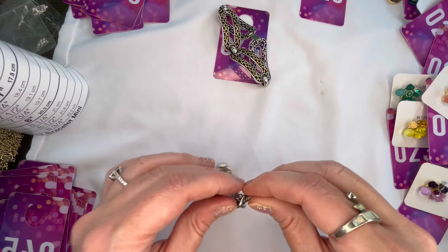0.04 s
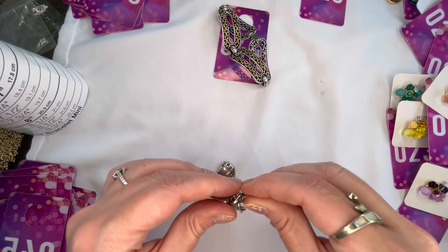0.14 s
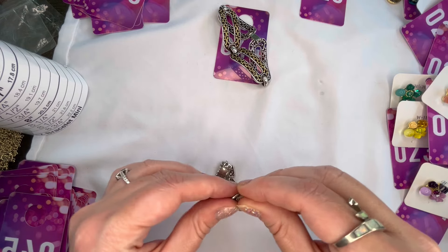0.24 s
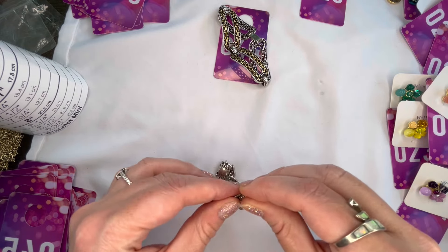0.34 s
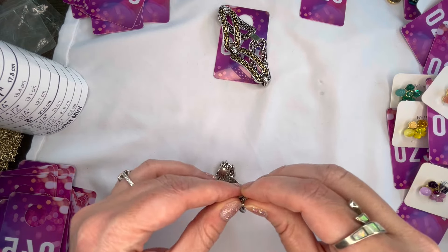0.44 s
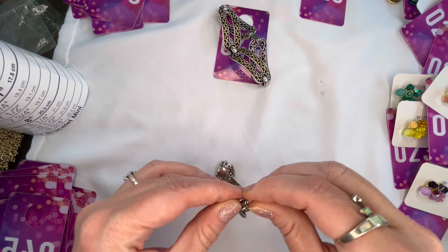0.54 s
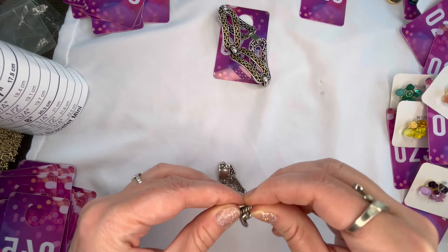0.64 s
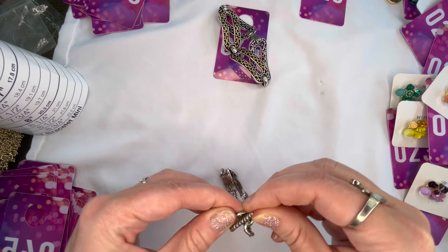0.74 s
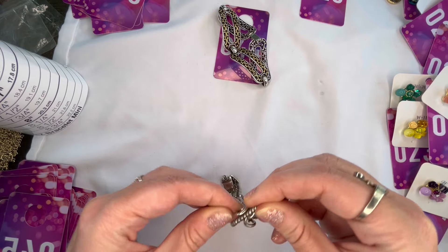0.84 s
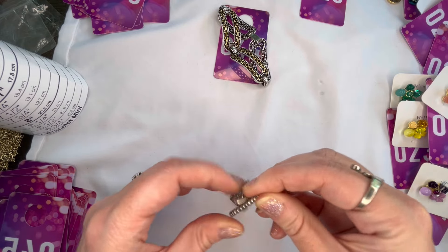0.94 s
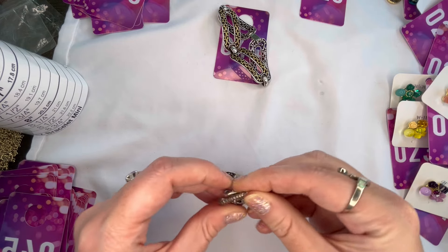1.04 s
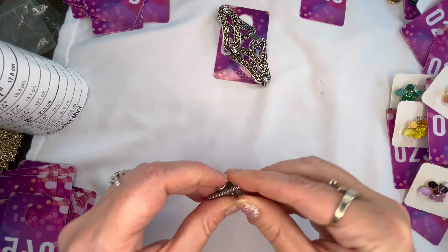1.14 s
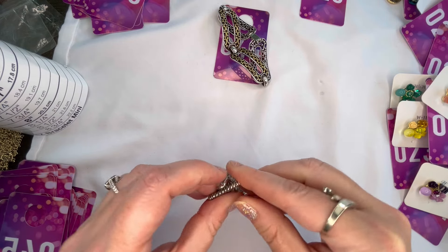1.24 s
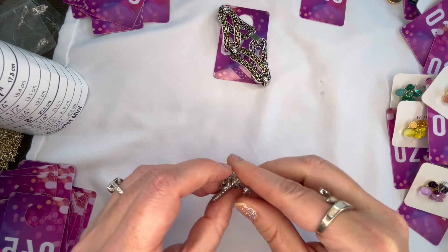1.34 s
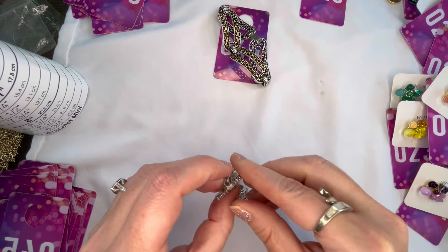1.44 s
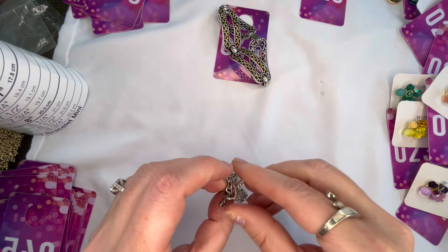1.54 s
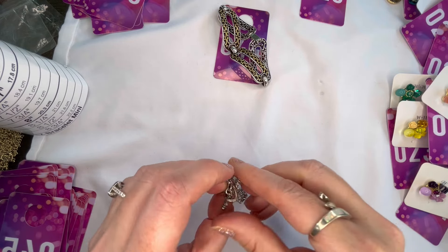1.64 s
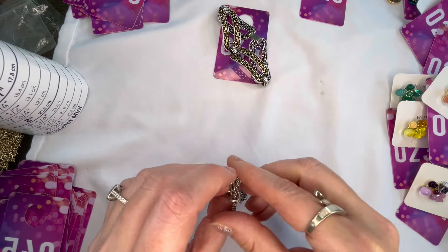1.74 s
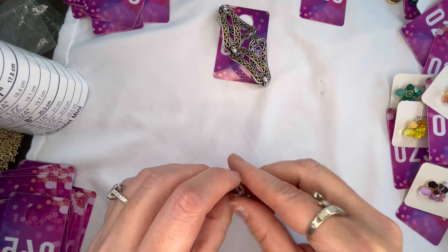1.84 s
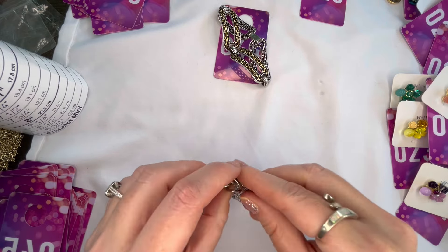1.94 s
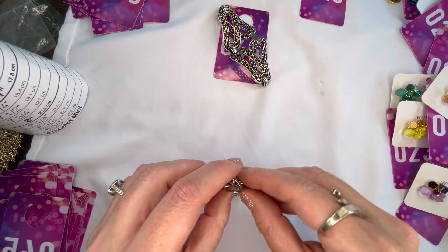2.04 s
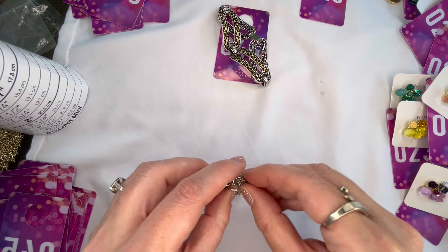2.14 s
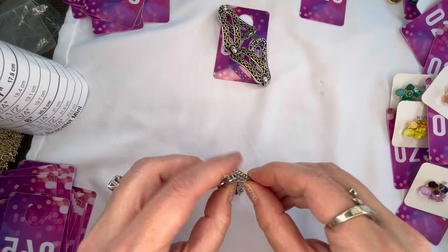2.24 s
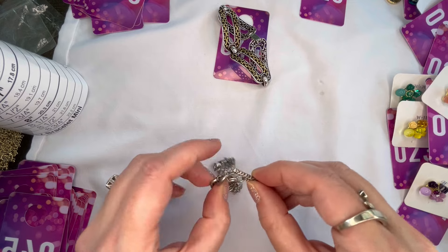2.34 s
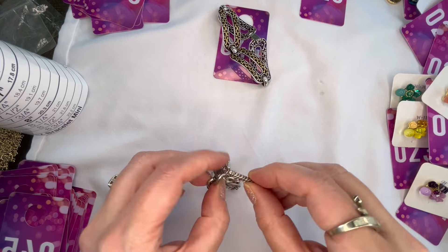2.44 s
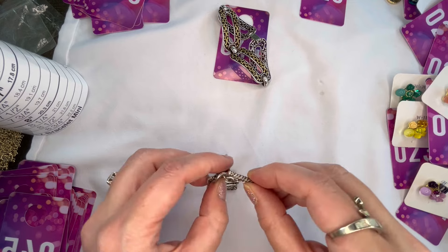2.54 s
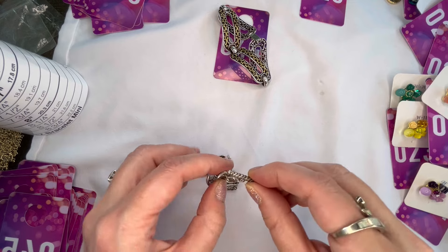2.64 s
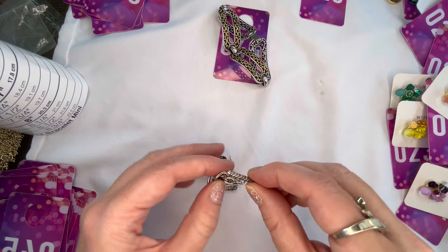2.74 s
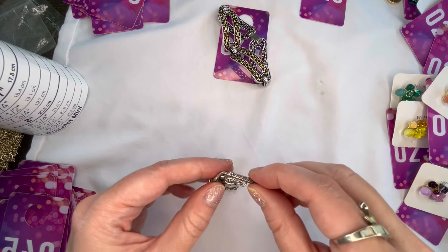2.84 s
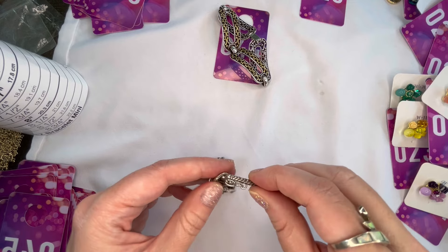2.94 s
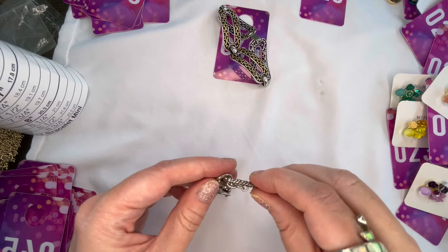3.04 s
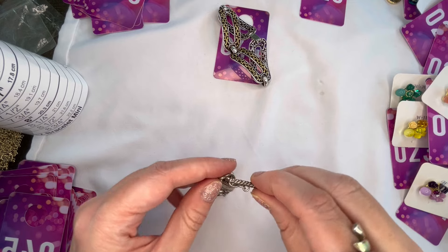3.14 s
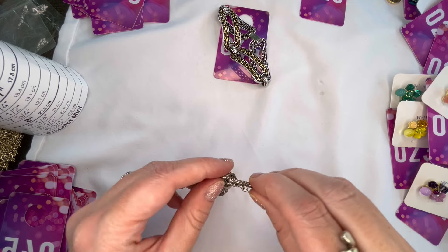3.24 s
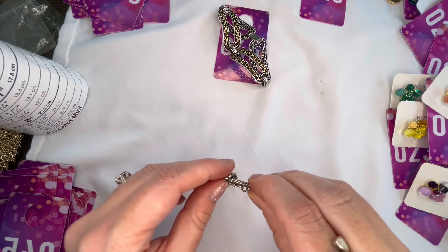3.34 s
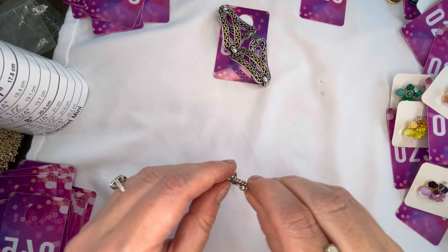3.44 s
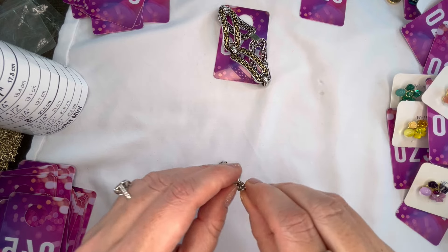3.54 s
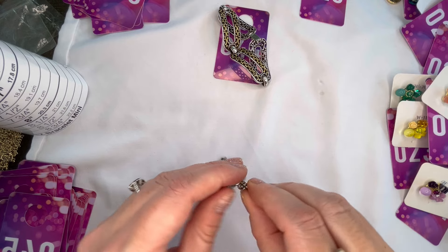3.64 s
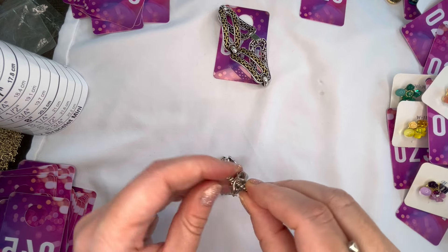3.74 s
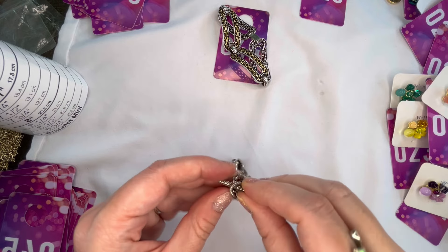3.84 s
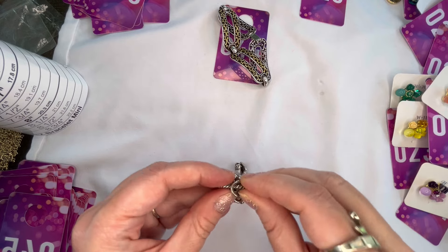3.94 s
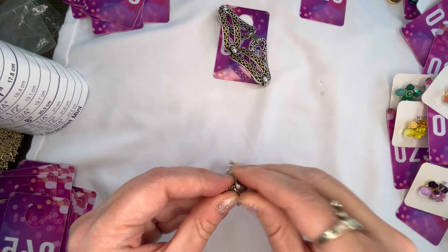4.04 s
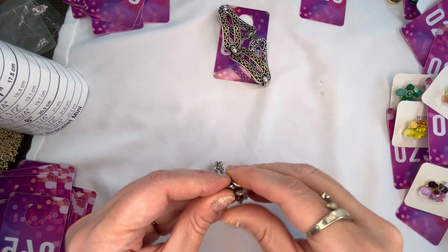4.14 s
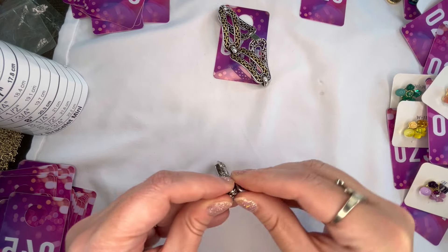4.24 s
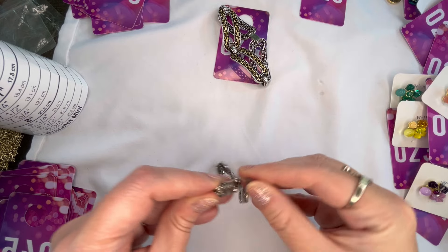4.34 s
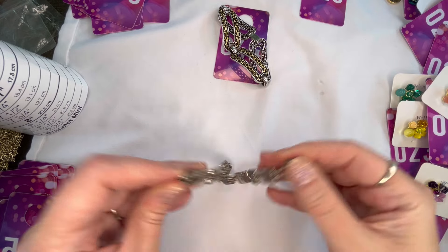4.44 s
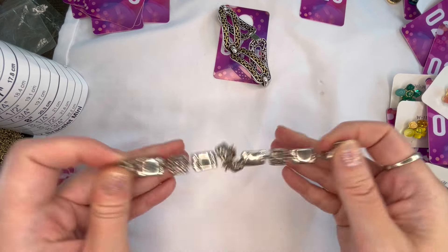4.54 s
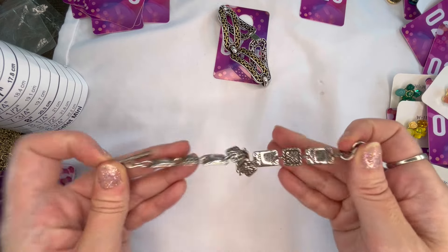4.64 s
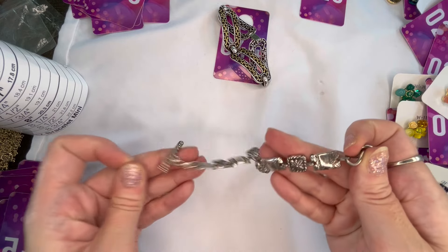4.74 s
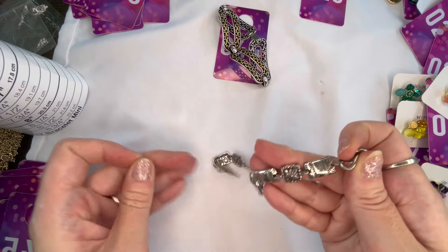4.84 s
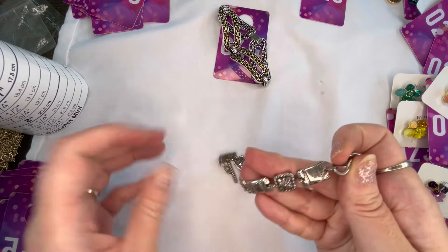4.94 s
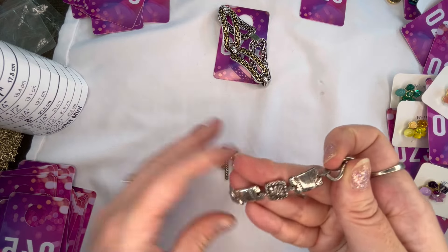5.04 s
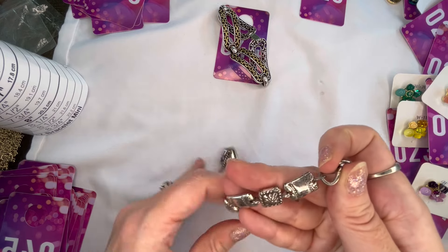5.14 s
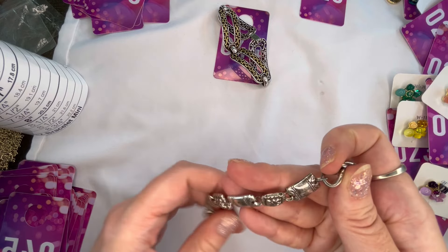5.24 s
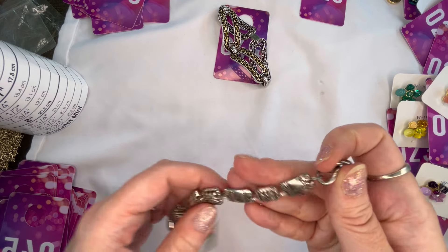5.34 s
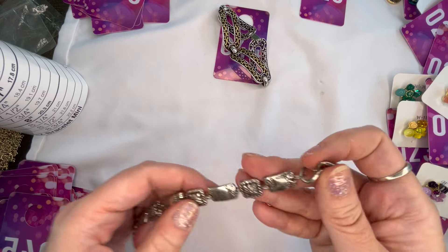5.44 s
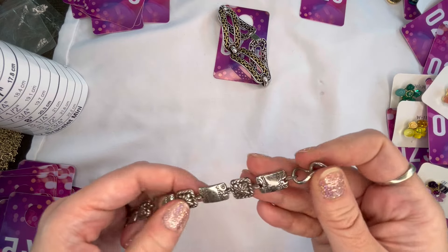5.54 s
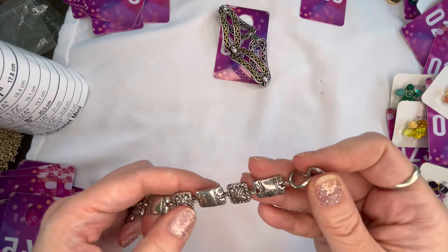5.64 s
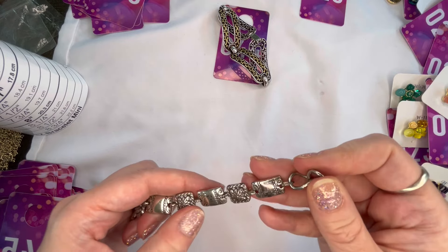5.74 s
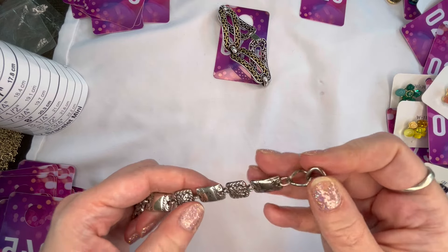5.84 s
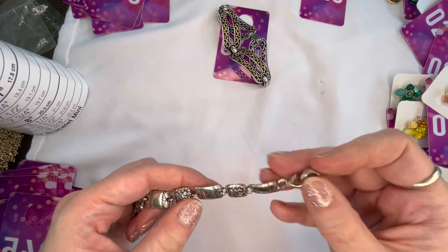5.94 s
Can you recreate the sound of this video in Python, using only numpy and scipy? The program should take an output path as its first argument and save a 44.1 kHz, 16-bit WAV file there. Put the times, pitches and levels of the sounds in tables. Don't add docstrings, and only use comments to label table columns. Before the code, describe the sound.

Delicate high clicks and faint rustles of small metal links in fingers, a sudden hard clinking knock with brief ring, then smaller taps.

```python
import sys
import numpy as np
from scipy import signal
from scipy.fft import rfft, irfft, next_fast_len
from scipy.io import wavfile
from scipy.ndimage import map_coordinates

SR = 44100
rng = np.random.default_rng(int(sys.argv[2]) if len(sys.argv) > 2 else 0)


def log_audio(samples):
    frames = np.atleast_2d(samples).T
    limited = np.clip(frames, -1, 1)
    pcm = np.round(limited * 32767).astype(np.int16)
    wavfile.write(sys.argv[1], SR, pcm)


def elevation(decibels):
    levels = np.asarray(decibels, float)
    return 10 ** (levels / 20)


N = 263530


def unit(x):
    return x / np.sqrt(np.mean(x ** 2, -1, keepdims=True) + 1e-20)


def along(points, hz):
    f, v = np.transpose(points)
    return np.interp(np.log(hz + 1), np.log(f + 1), v)


def curves(rows):
    s, *cols = np.transpose(rows)
    return [np.interp(np.arange(N) / SR, s, c) for c in cols]


def filtered(x, response):
    n = x.shape[-1]
    m = next_fast_len(n + min(n, 4096))
    hz = np.fft.rfftfreq(m, 1 / SR)
    return irfft(rfft(x, m) * response(hz), m)[..., :n]


def hump(hz, centre_hz, octaves):
    return np.exp(-.5 * (np.log2((hz + 1) / centre_hz) / octaves) ** 2)


def placed(times, rows, pan_db):
    starts = np.round(times * SR).astype(int)
    at = np.clip(starts[:, None] + np.arange(rows.shape[1]), 0, N)
    sides = []
    for side in (1, -1):
        panned = rows * elevation(side * pan_db / 2)[:, None]
        sides.append(np.bincount(at.ravel(), panned.ravel(), N + 1)[:N])
    return np.array(sides)


def peaked(rows, db):
    return rows / np.abs(rows).max(1, keepdims=True) * elevation(db)[:, None]


def bursts(count, size, rise, t60):
    t = np.maximum(np.arange(size) / SR - 1 / 1000, 0)
    swell = 1 - np.exp(-(t / rise) ** 2)
    decay = elevation(-60 * t / np.reshape(t60, (-1, 1)))
    return rng.standard_normal((count, size)) * swell * decay


# f/Hz, density level/dB
RUMBLE = [(20, -36.5), (28, -16), (37, -15), (43, -1), (50, -3), (62, 1), (73, -16), (90, -4.5), (118, -12),
          (158, -22), (200, -21), (330, -30), (500, -39), (1000, -74)]
# f/Hz, density level/dB
HISS = [(250, -15), (450, -12), (950, -8.5), (1100, -1.5), (1300, 0), (1620, -2.5), (1850, -14.5),
        (2600, -22), (7400, -27.5), (7800, -14.5), (8200, -28.5), (10500, -26), (12300, -44.5),
        (16000, -62.5)]
# f/Hz, left-right level/dB
HISS_PAN = [(200, 5.5), (700, 0), (1290, 16.5), (2380, 5), (4400, 9), (8120, -0.5)]
# t/s, rumble level/dB, fan level/dB
AIR = [(0.0, -59, -72), (1.35, -60, -71.5), (1.45, -59, -73), (5.31, -57.5, -71), (5.98, -62, -72)]


def air():
    rumble_db, fan_db = curves(AIR)
    mid, side = filtered(rng.standard_normal((2, N)), lambda hz: elevation(along(RUMBLE, hz)))
    rumble = unit(np.array([mid + .27 * side, mid - .27 * side])) * elevation([[-.9], [.9]])
    lead_s = .0003
    rumble = filtered(rumble, lambda hz: np.exp(np.array([[1j], [-1j]]) * np.pi * hz * lead_s))

    def fan_colour(hz):
        lean = elevation(along(HISS_PAN, hz) / 2)
        share = np.array([lean, 1 / lean]) / np.hypot(lean, 1 / lean)
        return elevation(along(HISS, hz)) * share

    hiss = filtered(rng.standard_normal((2, N)), fan_colour)
    return elevation(rumble_db + 0.5) * rumble + elevation(fan_db + 2.0) * hiss / np.std(hiss.mean(0))


# t/s, level/dB
HANDS = [(0, -75), (.45, -72), (1.5, -92), (3.4, -76.5), (3.65, -69.5), (4.1, -72), (4.4, -95.5),
         (5.1, -70), (5.4, -69), (5.62, -66), (5.7, -71.5)]


def hands():
    lumps = map_coordinates(rng.standard_normal(160), [np.arange(N) * 25 / SR])
    both = rng.standard_normal((2, N)) + rng.standard_normal(N)
    brush = filtered(both, lambda hz: hump(hz, 200, 0.91))
    return elevation(curves(HANDS)[0] + 2.5 * lumps) * unit(brush)


# f/Hz, t60/s
ROOM = [(200, 0.2), (1400, 0.22), (3500, 0.27), (10000, 0.13), (16000, 0.037)]


def room(x):
    out, step = np.zeros((2, N + SR)), SR // 5
    for at in range(0, N, step):
        hz, t, z = signal.stft(rng.standard_normal((2, SR // 3)), SR, nperseg=256)
        alike = 1 / (1 + (hz[:, None] / 600) ** 2)
        z = np.array([z[0], alike * z[0] + np.sqrt(1 - alike ** 2) * z[1]])
        decay = elevation(-60 * t / along(ROOM, hz)[:, None])
        tail = signal.istft(z * decay, SR, nperseg=256)[1]
        wet = signal.fftconvolve(x[None, at:at + step], tail / np.linalg.norm(tail[0]), axes=1)
        start = at + 180
        out[:, start:start + wet.shape[1]] += wet
    return out[:, :N]


# f/Hz, left-right level/dB
PORT_PAN = [(300, 0), (1000, 3), (4400, 7.5), (8000, -2.5), (14400, .4)]
# f/Hz, left lead/rad
PORT_TURN = [(0, 0), (1000, 1.3), (2500, 0), (6000, -12.8), (12500, -26.7), (14430, -30), (15300, -31.4),
             (16400, -33.2)]


def ports(x):
    f, turn = np.transpose(PORT_TURN)
    knots = 1.3 * rng.standard_normal(60)

    def half(hz):
        scatter = map_coordinates(knots, [hz / 600])
        bent = np.interp(hz, f, turn) + scatter * hump(hz, 6000, .55)
        return elevation(along(PORT_PAN, hz) / 2) * np.exp(.5j * bent)

    return filtered(x, lambda hz: np.array([half(hz), 1 / half(hz)]))


# t/s, peak level/dB, centre f/Hz, t60/s,
# left-right level/dB
CLINKS = [(.415, -70, 3800, 0.024, 13), (.439, -65, 3730, 0.018, 7), (.452, -74, 3900, 0.036, 14),
          (4.8322, -22.5, 11930, 0.044, 0), (4.8382, -24.5, 3600, 0.023, 4.5),
          (5.5405, -50.5, 2000, 0.033, 10), (5.541, -39.5, 810, 0.018, 8), (5.541, -56, 4500, 0.1, 8),
          (4.843, -32, 2040, .03, -13), (4.809, -45.5, 2560, 0.11, 6), (5.916, -58, 6900, .06, 9),
          (5.93, -24, 7040, 0.016, 18), (5.9362, -28, 8900, 0.0097, 25), (5.9379, -40.5, 8900, 0.011, 7.5),
          (5.933, -39.5, 4060, 0.067, 6), (5.943, -40, 1490, 0.045, -7), (5.951, -37.5, 1440, 0.024, 13.5)]
# t/s, peak level/dB, centre f/Hz, t60/s, left-right level/dB
BLOWS = [
    (4.8237, -17, 1200, 0.012, 2.5),
    (4.832, -31, 2500, 0.057, 5.5),
    (4.8392, -15.5, 3630, 0.025, 10.5),
    (4.8399, -12, 3390, 0.011, 11.5),
    (4.842, -29.5, 4570, 0.051, 9.5),
    (4.848, -32, 1953, 0.026, 0),
    (5.5405, -29.5, 1380, 0.0045, -2),
    (5.546, -51.5, 2470, 0.11, 10),
    (.002, -48.5, 690, 0.099, -4.5),
]
# t/s, peak level/dB, centre f/Hz, t60/s, left-right level/dB
THUDS = [
    (.003, -44.5, 121, 0.079, 3),
    (4.059, -50.5, 184, 0.0063, -1),
    (4.824, -31.5, 168, 0.11, -1),
    (4.842, -42, 194.7, 0.12, -3),
    (5.203, -42.5, 338, 0.011, 1),
    (5.232, -52, 296, 0.023, 7),
    (5.542, -52.5, 330, 0.39, 13.5),
    (5.932, -50.5, 700, 0.23, 5),
]
# f/Hz, density level/dB
TABLE = [(60, -1), (200, 3.5), (520, -6), (1000, -5), (1450, -14.5), (2070, -8.5), (2600, -12),
         (3600, -8.5), (6400, -14), (9000, -14.5), (16000, -36)]


def knocks():
    s, db, centre_hz, t60, pan_db = np.transpose(CLINKS + BLOWS + THUDS)
    octaves = np.repeat([.21, 1.3, 1.43], [len(CLINKS), len(BLOWS), len(THUDS)])
    blow = bursts(count=len(s), size=4096, rise=0.0014, t60=t60)
    blow[:, 66] += 4.5

    def bend(hz):
        return np.exp(-2j * np.pi * .11 * (2 * np.sqrt(hz) - hz / np.sqrt(1500)))

    def colour(hz):
        resonance = hump(hz, centre_hz[:, None], octaves[:, None])
        return elevation(along(TABLE, hz)) * resonance * bend(np.minimum(hz, 1500))

    return placed(s - 1 / 1000, peaked(filtered(blow, colour), db), pan_db)


# struck t/s, peak level/dB, t60/s, damped t/s
CHIMES = [(4.8474, -13.5, .16, 4.887), (5.119, -60, .1, 5.2), (5.139, -57, .1, 5.2), (5.189, -53, .1, 5.25),
          (5.259, -55, .15, 5.35), (5.21, -56, .12, 5.3), (5.318, -69, .06, 5.4), (5.541, -56, .05, 5.55),
          (5.556, -68, .06, 5.7), (5.6, -70, .2, 5.606), (5.733, -71, .05, 5.742)]
# f/Hz, level/dB
BELL = [
    (14427, 0),
    (14538, -21),
    (15030, -27),
]


def chime():
    t = np.arange(SR // 4) / SR
    s, db, t60, until = np.transpose(CHIMES)[:, :, None]
    ring = sum(elevation(level_db) * np.sin(2 * np.pi * hz * t) for hz, level_db in BELL)
    damping = np.clip((s + t - until) / .004, 0, 1)
    decay_db = -60 * t / t60 - 8.5 * damping
    onset = 1 - np.exp(-t / 0.00038)
    return placed(s[:, 0], elevation(db + decay_db) * onset * ring, np.zeros(len(s)))


# t/s, length/s, level/dB
MOVES = [(-.02, 0.049, -60), (.08, 0.2, -82), (0.602, .03, -85), (0.781, .11, -75.5), (0.915, 0.11, -67),
         (1.083, 0.036, -68), (1.355, 0.16, -84), (1.842, 0.033, -83), (2.11, 0.16, -85),
         (2.274, 0.043, -72.5), (2.456, 0.029, -79), (2.569, 0.031, -81), (2.81, 0.046, -82),
         (3.135, 0.035, -93), (3.464, .1, -82), (3.587, .13, -66), (3.985, 0.04, -71), (4.033, .025, -62),
         (4.182, 0.13, -75), (4.386, .04, -71.5), (4.57, .02, -78), (4.608, 0.11, -74), (4.75, 0.07, -60),
         (4.818, 0.039, -51), (5.926, 0.014, -45), (5.107, 0.18, -67)]
# f/Hz, density level/dB
LINKS = [(1200, -42), (2000, -10.5), (3000, -9.5), (5600, 4.5), (7500, -1.5), (8900, -3.5), (11000, -0.5),
         (12300, -13.5), (13300, -21.5), (14600, -9.5), (15400, -13), (15900, -13.5), (16200, -31.5),
         (16800, -36.5)]


def rustle():
    t = np.arange(N) / SR
    rise_s, t60_s = 0.0089, 0.27
    effort = np.zeros(N)
    for s, held, db in MOVES:
        swell = np.clip((t - s) / rise_s, 0, 1) ** 2
        effort += swell * elevation(db - 60 * np.maximum(t - s - held, 0) / t60_s)
    size = elevation(1.4 * np.minimum(rng.exponential(size=N), 3.2))
    touch = (rng.random(N) < 1100 / SR) * size
    life = elevation(-60 * np.arange(300) / SR / .005)
    power = signal.fftconvolve(touch ** 2, life ** 2)[:N]
    grains = np.sqrt(np.abs(power)) * rng.standard_normal(N)

    def faint(hz):
        return elevation(along(LINKS, hz)) * (0.27 + hump(hz, 10500, 0.68))

    return effort * elevation(2.5) * unit(filtered(grains, faint))


# t/s, peak level/dB, top part level/dB relative to the peak, low part level/dB
# relative to the peak, favoured f/Hz
CONTACTS = [(0.0024, -28, -46, -25, 9100), (0.0084, -40, -25, -27, 9550), (0.0124, -25.5, -23, -21, 10800),
            (0.0184, -38, -23, -28, 9600), (0.0313, -30.5, -28, -21, 9800), (0.0374, -39, -17, -17, 10800),
            (0.0444, -39, -19, -16, 9400), (0.0563, -32.5, -19, -21, 11600), (0.0774, -53, -17, -13, 11400),
            (0.1082, -50, -7, -21, 8790), (0.1114, -49, -18, -16, 9320), (0.1264, -50, -25, -18, 6780),
            (0.1374, -55, -18, -19, 9360), (0.2124, -48.5, -28, -25, 9320), (0.2448, -47, -21, -19, 9800),
            (0.2927, -45.5, -34, -16.5, 9100), (0.594, -55.5, -35, -29, 8900), (0.617, -51.5, -35, -27, 6820),
            (0.6574, -68, -35, -13, 7840), (0.7188, -66, -37, -18, 9540), (0.7632, -49.5, -31, -28, 9000),
            (0.7981, -46, -15, -20, 8950), (0.817, -45.5, -15, -19.5, 9260), (0.84, -50.5, -20, -17, 11000),
            (0.8724, -45.5, -29, -23, 9270), (0.9293, -40, -13, -14, 9500), (0.9512, -36, -22, -30, 9900),
            (0.9584, -42, -21, -19, 9650), (0.9674, -44, -29, -21, 11000), (0.9911, -35, -18, -28, 10700),
            (1.0074, -53, -16, -13, 10800), (1.0211, -44, -19, -12.5, 9520), (1.058, -54, -16, -22, 9110),
            (1.0724, -54, -11, -21, 10600), (1.0774, -51, -18, -16, 9100), (1.0999, -43, -15, -17.5, 8650),
            (1.1273, -35, -13, -21.5, 11300), (1.1354, -54, -11, -17, 10500),
            (1.195, -52, -28, -19, 8950), (1.3369, -64, 5, -23, 8770), (1.3613, -52.5, -9, -16, 8800),
           (1.402, -59, -5, -14, 8800), (1.4324, -56, -9, -20, 9100), (1.4581, -49, -19, -22, 9100),
           (1.4665, -47, -14, -20, 10600), (1.8598, -41, -15, -26, 10100), (1.8724, -46.5, -12, -18, 11400),
           (1.9055, -56, -18, -17, 9120), (1.933, -48.5, -6, -20, 10900), (2.0175, -54.5, -53, -16, 9110),
           (2.0542, -57, -49, -23, 9000), (2.1354, -53, -18, -20, 9110), (2.143, -56, -21, -20, 8000),
           (2.2307, -48.5, -21, -20.5, 9200), (2.2788, -44.5, -33, -19.5, 10400),
           (2.3052, -43.5, -15, -17.5, 10600), (2.3261, -54, -28, -9, 8800), (2.472, -50, -27, -18, 10900),
           (2.5816, -41, -26, -25, 11200), (2.611, -52.5, -28, -9, 11100), (2.622, -53, -35, -24, 8520),
           (2.8112, -48.5, -20, -17.5, 10600), (2.833, -57, -21, -21, 9200), (3.148, -47.5, -23, -20, 8900),
           (3.1757, -53, -35, -23, 10700), (3.193, -53, -29, -16, 8600), (3.4376, -56, -5, -26, 9400),
           (3.468, -49, -3, -19, 11200), (3.522, -50.5, -14, -21, 8850), (3.532, -54.5, -14, -27, 8750),
           (3.5533, -54, -11, -17, 8860),
            (3.5817, -48, -9, -21, 10800), (3.5965, -40.5, -10, -27, 10700), (3.603, -39, -18, -35, 11000),
           (3.6114, -54, -16, -24, 11100), (3.6244, -52, -8.5, -17, 8810), (3.634, -51, -4, -20, 8950),
           (3.642, -43, -25, -26, 8690), (3.6464, -47, -21, -24, 8670), (3.6534, -43, -16, -23, 10700),
           (3.6574, -49, -8, -18, 10900), (3.664, -48, -8, -15, 8640), (3.67, -44, -9, -16, 10600),
           (3.676, -44, -14.5, -10, 9100), (3.6814, -48, -8, -15, 8800), (3.6934, -43, -12, -18, 11500),
           (3.7034, -46, -14.5, -13, 11300), (3.716, -47, -10.5, -14, 11400),
           (3.7239, -39, -15, -15.5, 11600), (3.7334, -60, -24, -17, 11400),
           (3.8008, -61.5, -16, -4.5, 9000), (3.842, -48.5, -21, -23, 11500),
           (3.9923, -39, -18.5, -19.5, 12000), (4.0184, -43, -14, -13.5, 9200),
           (4.0356, -49, -12, -11, 11200), (4.0414, -34.5, -16.5, -18, 11500),
           (4.0475, -33, -17, -23, 10100), (4.0513, -38, -20, -29, 10500), (4.1215, -74, -29, -17, 8700),
           (4.1614, -67, -13, -22, 9040), (4.1769, -40, -16, -27, 10700), (4.1862, -35, -20, -23.5, 9250),
           (4.2138, -40, -20, -30, 11700), (4.2195, -48, -15, -22, 11800),
           (4.225, -42.5, -14, -17.5, 10600), (4.2428, -48, -20, -19, 10600),
           (4.2763, -40.5, -13, -22, 10700), (4.2837, -41, -13, -16.5, 11600),
            (4.334, -58, -16, -24, 9070), (4.3846, -55, -19, -28, 8990), (4.3939, -36, -21, -28, 9200),
              (4.4246, -49, -20, -14, 9220), (4.5216, -61, -13, -19, 8030), (4.563, -59, -25, -26, 11300),
              (4.576, -48, -24, -34, 10600), (4.6254, -44.5, -23, -26, 7040),
              (4.6307, -37, -21, -21.5, 11000), (4.6677, -41.5, -22, -24, 10300),
              (4.688, -58, -23, -22, 9000), (4.7052, -56, -21, -25, 10400), (4.7224, -51, -21, -23, 10700),
              (4.7316, -46.5, -17, -13, 8980), (4.7522, -33.5, -14, -17.5, 10400),
              (4.78, -43, -17, -17, 11150), (4.79, -44.5, -17, -3, 10900), (4.928, -40.5, -11, -13, 11000),
              (4.9474, -41.5, -15.5, -10.5, 10500), (5.12, -45, -24, -16.5, 11000),
              (5.1337, -40, -18, -12, 11400), (5.139, -44.5, -18.5, -14, 8200),
              (5.2096, -30, -19, -22.5, 8800), (5.2585, -43.5, -21, -12, 11240),
              (5.2754, -41, -32, -12.5, 11300), (5.8346, -58.5, -23, -19, 9370),
              (5.8581, -54.5, -18, -21, 9000),
            (.172, -64, -8, -26, 9000), (.186, -62, -10, -27, 10000), (.205, -64, -25, -18, 9500),
         (.8504, -58, -20, -16, 9500), (.92, -45.5, -10, -12.5, 9700), (3.5895, -52, -7, -22, 9500),
         (4.0097, -46, -7, -18, 9500), (4.6145, -44, -19.5, -30, 10500), (4.6193, -46, -6, -15, 9100),
         (4.699, -53, -17, -17, 10000), (4.7985, -49.5, -11.5, -17, 10000), (4.812, -48, -19, -16, 10900),
         (4.816, -54, -19.5, -12, 10800), (5.088, -59.5, -19, -14, 10970), (5.108, -55, -12, -18, 11400),
         (5.293, -54, -25, -8.5, 11000), (5.296, -52, -25, -16, 10600), (5.319, -56.5, -20, 0, 11000),
         (5.443, -53, -30, -12.5, 10560), (5.515, -54.5, -41, -11, 9870), (5.527, -59, -8, -13, 11400),
         (5.58, -68, -20, -16, 9100), (4.8251, -32, -19, -20, 10000), (4.8417, -20, -20, -9, 9000),
         (4.8468, -17, -14, -30.5, 11000), (5.5415, -56, -6.5, -14.5, 7860),
         (5.931, -29.5, -34.5, -20, 8900), (5.939, -19.5, -24.5, -24, 9100), (5.948, -29.5, -22, -7, 8400)]


def ticks():
    s, db, top_db, low_db, centre_hz = np.transpose(CONTACTS)
    luck = rng.standard_normal((len(s), 4))
    snap = bursts(count=len(s), size=640, rise=.0021, t60=.0058 * elevation(2.5 * luck[:, 0]))
    snap[:, 95] += .4
    settling = bursts(count=len(s), size=640, rise=0.0024, t60=0.027)
    puff = snap + elevation(-27.0) * settling

    def part(low_hz, high_hz):
        return filtered(puff, lambda hz: elevation(along(LINKS, hz)) * (hz > low_hz) * (hz <= high_hz))

    main, low, top = part(6500, 13500), part(1500, 6500), part(13500, 17000)
    main = filtered(main, lambda hz: .45 + hump(hz, centre_hz[:, None], .15))
    rows = peaked(main, db + 1.4)
    rows = rows + peaked(low, db + low_db + 8) + peaked(top, db + top_db + 6)
    return placed(s - .001, rows, 2.5 * luck[:, 1])


# t/s, level/dB
WARMUP = [
    (0, 6.5),
    (.062, 5.5),
    (.072, 1),
    (.2, 0),
]


def scene():
    metal, table, ring = ticks() + rustle(), knocks(), chime()
    direct = ports(metal + table + ring)
    into_room = elevation(-11.5) * metal.mean(0) + elevation(-36.5) * ring.mean(0) + elevation(-5.5) * table.mean(0)
    return direct + room(into_room) + elevation(curves(WARMUP)[0]) * air() + hands()


def roll_off(x):
    return signal.sosfilt(signal.butter(12, 16500, fs=SR, output="sos"), x)


def record(dry):
    return roll_off(dry)


dry = scene()
out = record(dry)
log_audio(out)
```